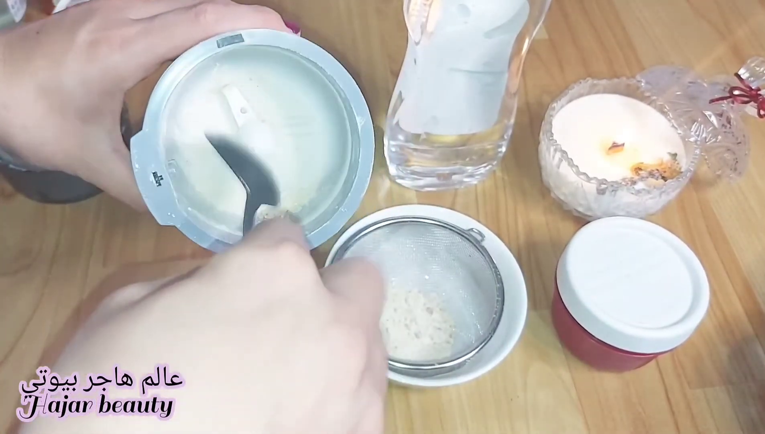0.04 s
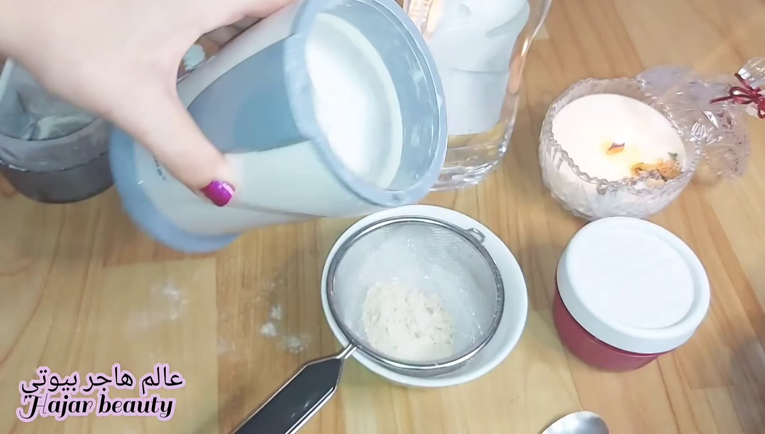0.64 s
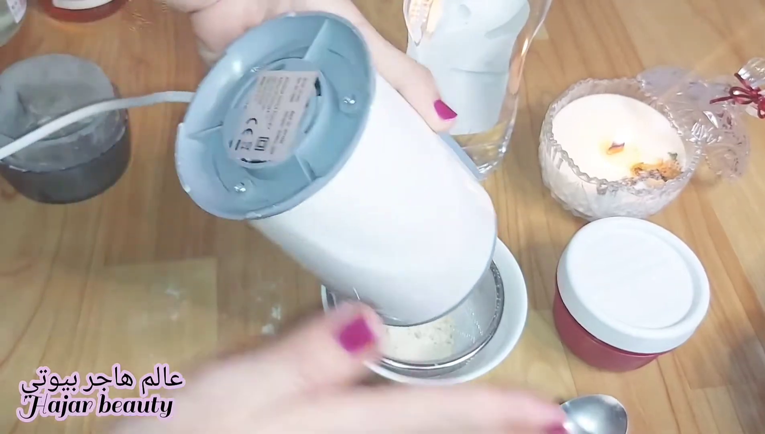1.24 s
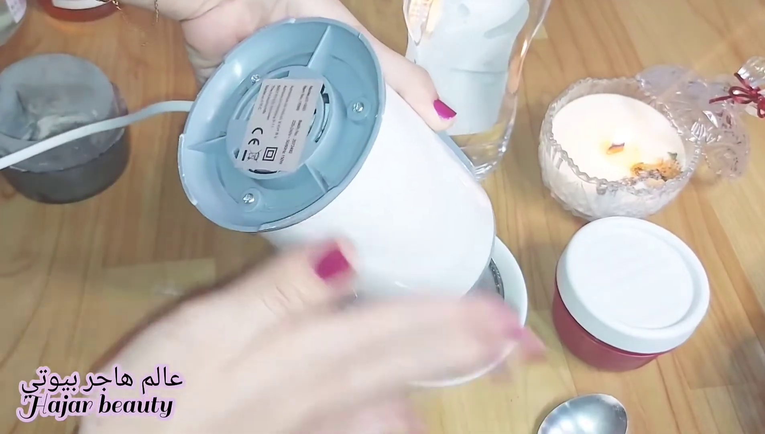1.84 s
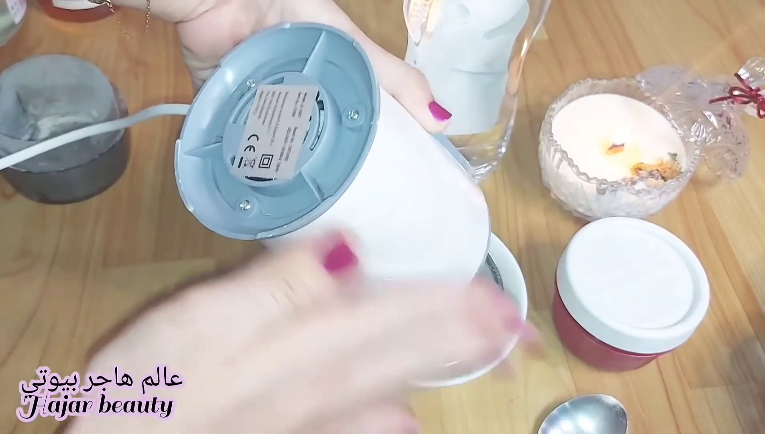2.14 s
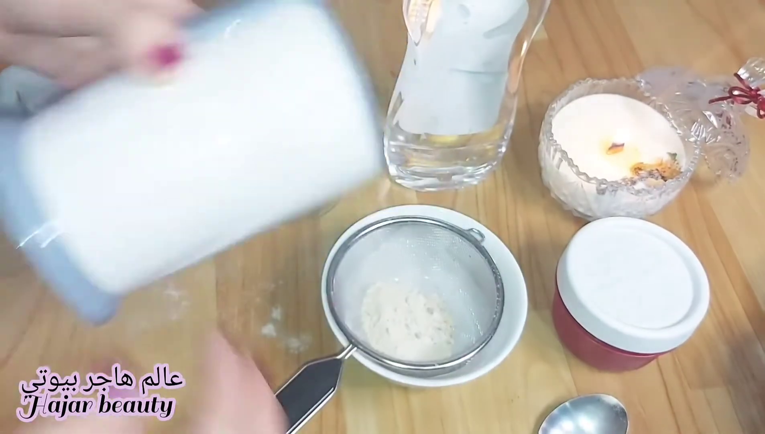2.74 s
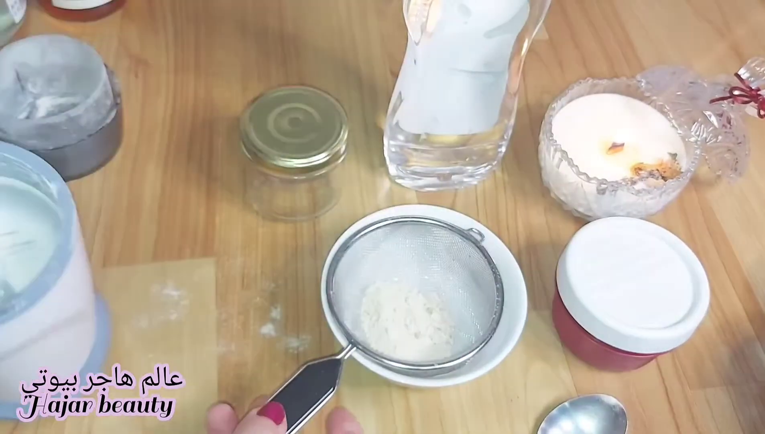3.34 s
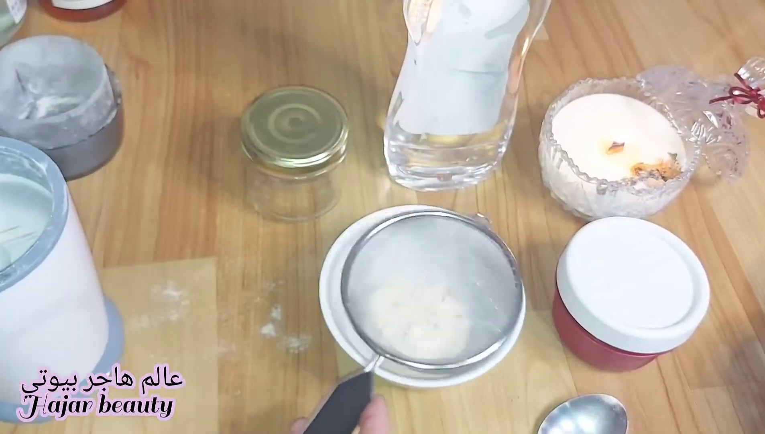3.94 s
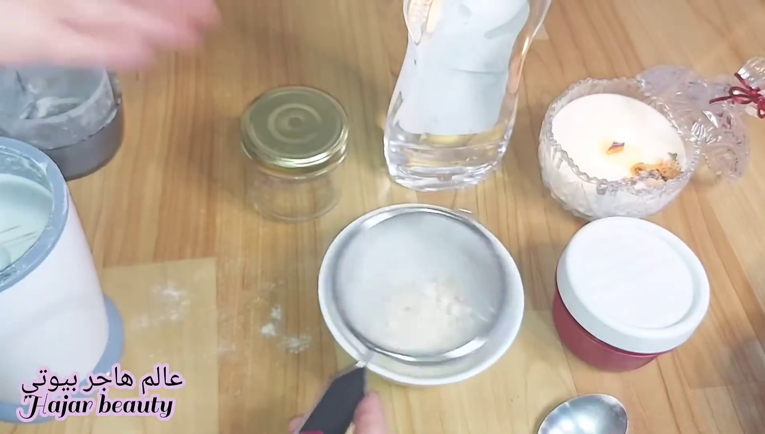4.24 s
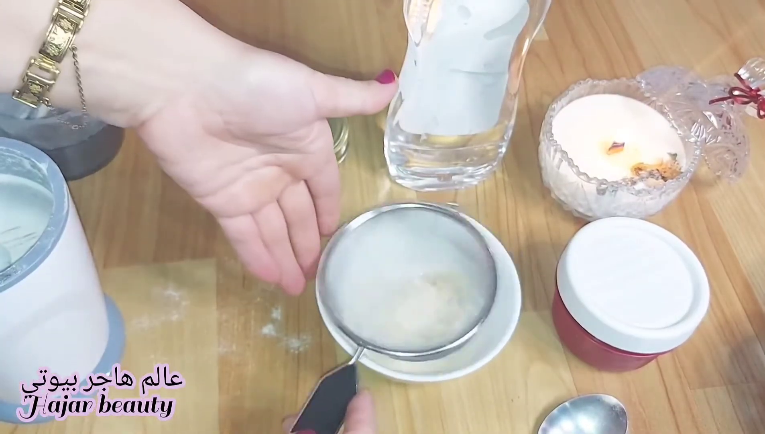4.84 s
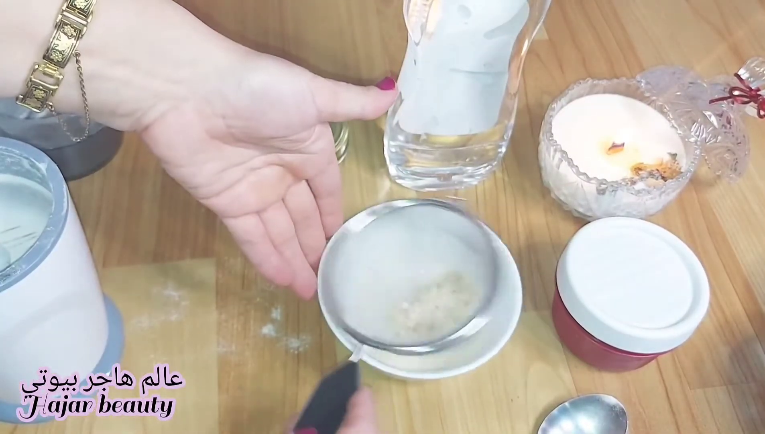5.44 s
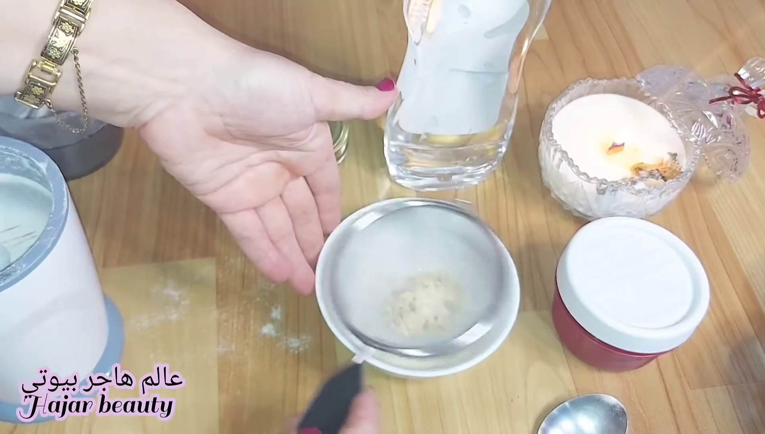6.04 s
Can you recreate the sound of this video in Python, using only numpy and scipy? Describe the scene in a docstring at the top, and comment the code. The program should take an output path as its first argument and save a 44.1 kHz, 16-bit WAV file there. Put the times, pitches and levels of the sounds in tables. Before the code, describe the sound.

A spoon knocks and drops, a palm pats a hollow plastic grinder, then a metal sieve is shaken and tapped on a ceramic bowl.

```python
"""First a spoon knocks in a plastic grinder cup, then drops on the wooden table of a small, hard-walled
kitchen. A palm pats the upturned grinder seven times to empty it, and its hollow body booms.
The grinder is set down, its rubber feet sticking and slipping in a short judder.
A steel sieve is picked up and shaken over a ceramic bowl, so that powder hisses through the mesh.
Last, the sieve is tapped hard on the bowl and its rim rings."""
import sys
import numpy as np
from scipy import signal
from scipy.fft import rfft, irfft, next_fast_len
from scipy.io import wavfile
from scipy.ndimage import map_coordinates

SR = 44100
rng = np.random.default_rng(int(sys.argv[2]) if len(sys.argv) > 2 else 0)


def dump_mix(stems):
    """Bounce the given channels to the path in sys.argv[1] as a 16-bit WAV at rate SR."""
    frames = np.atleast_2d(stems).T  # one column per channel
    limited = np.clip(frames, -1, 1)  # hard clip at full scale
    pcm = np.round(limited * 32767).astype(np.int16)
    wavfile.write(sys.argv[1], SR, pcm)


N = 269346
CLOCK = np.arange(N) / SR  # seconds through the scene
T = np.arange(int(.8 * SR)) / SR  # seconds through one hit

# A t60 is the time a sound takes to fade by 60 dB. A "tone" says how strong each frequency is.
# how long the room echoes: f/Hz, t60/s
ROOM_T60 = [(100, 0.62), (300, 0.49), (800, 0.45), (2000, 0.36), (5000, 0.35), (9000, 0.33), (14000, 0.19)]
# how alike the room sounds left and right: f/Hz, likeness (1 = the same)
ROOM_ALIKE = [(60, .88), (140, .95), (280, .92), (500, .3), (900, .05), (2000, .15), (8000, .2)]

# tones of the longer noises: f/Hz, level/dB
HUM_TONE = [(15, -49), (25, -8.5), (76, 1), (175, -16.5), (301, -2.5), (863, -30), (2910, -32.5),
            (3520, -40.5), (4140, -36.5), (7920, -39.5), (12500, -28), (14800, -37.5), (16000, -56.5)]
RUB_TONE = [(30, -26), (55, -15), (88, -3), (150, -10.5), (237, -12), (297, -0.5), (368, -10), (495, -8),
            (650, -23.5), (1000, -33), (2500, -40), (5000, -62)]
HISS_TONE = [(700, 0), (1500, -13), (4000, 3), (6500, 1.5), (9000, 3), (12000, 3.5), (14700, -1),
             (16000, -12.5)]
FEET_TONE = [(100, -23), (280, 1.5), (450, -16), (800, -17.5), (1400, -37), (3500, -27), (6000, -41),
             (14000, -61.5)]

# tones of the short hits: f/Hz, level/dB
THUD_TONE = [(25, -20), (55, -3.5), (100, -7), (160, -0.5), (300, -6), (500, -10.5), (900, -36.5),
             (2000, -44.5)]
RATTLE_TONE = [(350, -54), (600, -10), (881, -23), (1410, 0.5), (1680, -11), (3300, -9), (3890, -4),
               (4910, -17), (11300, -19.5), (14700, -27), (16000, -34.5)]
KNOCK_TONE = [(47, -59), (80, -26), (302, -8), (444, -6.5), (489, -4), (617, -8), (1060, -9.5), (2380, -11),
              (3300, -48), (5990, -36), (8000, -79.5), (10400, -73), (17600, -120)]
CUP_CRACK_TONE = [(300, -1.5), (420, 26.5), (900, -23.5), (1550, 11), (3100, -10.5), (4000, 15.5),
                  (5000, -7.5), (6300, -6), (9500, -15), (12200, 7), (13500, -8), (16000, -26)]
SPOON_CLACK_TONE = [(120, -51), (200, -3.5), (1180, -9), (1740, 0.5), (3310, -2.5), (3620, -2),
                    (6520, -17.5), (6880, -17), (11100, -15), (14100, -26), (16000, -22.5)]
AIR_POP_TONE = [(130, -35), (260, -9), (330, -5), (560, -10), (850, -14.5), (1130, -12.5), (1450, -17.5),
                (2050, -10), (2450, -19), (2850, -15.5), (3900, -23.5), (7000, -25.5), (12000, -45)]
SKIN_SMACK_TONE = [(1500, -26.5), (4000, 7.5), (6000, -14.5), (8000, -5), (11000, 4), (13500, -5),
                   (16000, -23.5)]
BOWL_KNOCK_TONE = [(40, -9), (120, -11.5), (230, -0.5), (300, 1), (550, 3.5), (900, -7), (1500, -8),
                   (2400, -9.5), (4000, -22), (8000, -48)]
RIM_CRACK_TONE = [(700, -8), (1600, -9), (2400, 1), (3300, -7), (4000, 0.5), (4650, -15), (5400, 0.5),
                  (7200, -13.5), (8100, -1), (9600, -19), (11300, -5.5), (13300, -20), (14600, -8.5),
                  (16500, -8.5)]

# the notes each object rings with when hit: f/Hz, level/dB, t60/s
TABLE_NOTES = [(93, -12, 0.59), (137.2, -1, 0.43), (207, -5, 0.19), (290, -19, 0.16)]
CUP_WALL_NOTES = [(407, -33.5, 0.52), (730, -12.5, 0.043), (1220, -9.5, 0.04), (1428, 5, 0.025),
                  (1702, -1.5, 0.017), (2760, -4.5, 0.019)]
CUP_EDGE_NOTES = [(1460, -10.5, 0.046), (2690, -6.5, 0.04), (3970, -11.5, 0.017), (4040, 14, 0.0115),
                  (7840, -24.5, 0.012), (5680, -2, 0.026), (6530, 0, 0.0052), (12600, -11, 0.025),
                  (13200, -10.5, .03)]
SPOON_SCOOP_NOTES = [(5868, 1, 0.84), (10310, -11.5, 0.41)]
SPOON_HANDLE_NOTES = [(3521, -3.5, 0.31), (3783, 0, 0.36), (5230, -5.5, 0.25), (6940, -1, 0.33),
                      (8495, -25, 0.21), (8845, -17, 0.21), (10700, -14.5, 0.17)]
GRINDER_NOTES = [(250.5, -5, 0.5), (276.8, 11, 0.32), (330, -9, 0.12), (402, 6, 0.13), (456, -17.5, .2),
                 (664, -2.5, 0.33), (1197, 2.5, 0.072)]
RIM_LOW_NOTE = [(2946, 0, .46)]
RIM_HIGH_NOTES = [(5207, -6.5, .5), (5240, -13, .4), (7930, -7, .24), (7962, 0, .19), (10993, 1, .21),
                  (11040, -8, .14), (14340, -12, .18), (14590, -12, .12), (15250, -10, .18)]
BOWL_WALL_NOTE = [(1209, 0, 0.34)]
BOWL_BOOM_NOTES = [(278.2, -5, 0.34), (302.5, 1.5, 0.37), (342.7, 11, 0.085), (416, 3.5, 0.19),
                   (490, 0, 0.32), (550, -26, 0.3), (579.3, -14, 0.59), (593, -20.5, 0.71),
                   (784, -7.5, 0.31), (960, -17, 0.29)]  # the bowl standing on the table
CLINK_NOTES = [(3540, -1, 0.011), (4050, -7, 0.0092), (4030, 13.5, 0.011), (5750, -27, 0.0066),
               (7500, 17, 0.0083), (11000, 10.5, 0.043), (14570, -20, 0.014)]  # rim and bowl while they touch
# which side the notes of the rim and the bowl's wall lean to: f/Hz, left minus right/dB
RIM_PAN = [(1206, -1), (2946, -9.5), (5207, -8.5), (7950, -11.5), (11000, 3.5), (15000, 1)]

# a hand or an object slides: t of the peak/s, rub/dB, hiss/dB, rise/s, t60/s
SLIDES = [(2.939, -58, -62, 0.094, 0.84), (3.06, -38, -78, 0.13, 0.44), (3.25, -52.5, -80.5, 0.45, 2.05),
          (3.85, -42, -68, 0.11, 0.53)]
# things nudged on the table: t/s, thud/dB, table top/dB, rattle/dB
BUMPS = [(2.878, -50.5, -80, -51.5), (3.627, -44, -38.5, -57.5), (3.807, -42, -32.5, -42.5)]
# rubber feet slip on the table: t/s, slip rate/Hz, level/dB
JUDDER = [(2.969, 320, -69), (3.012, 310, -42.5), (3.056, 230, -38.5), (3.086, 275, -45), (3.11, 350, -56)]
# a rubber foot drags: t/s, f/Hz, level/dB
SQUEAKS = [(2.959, 1090, -48), (3.025, 1113, -55)]
# the hand rubs the sieve's handle: t/s, level/dB
GRIP_RUB = [(4.08, -77), (4.201, -46), (4.3, -55.5), (4.5, -50.5), (4.63, -43), (4.72, -46.5), (5.2, -46),
            (5.5, -57)]
# the spoon hits the cup: t/s, hollow knock/dB, bright tick/dB, thud/dB
CUP_KNOCKS = [(.0250, -22, -47.5, -74.5), (0.1692, -41.5, -41, -59.5), (0.3433, -37.5, -54, -35)]
# an end of the spoon lands: t/s, knock/dB, clack/dB, scoop ring/dB, handle ring/dB
SPOON_DROPS = [(0.7216, -38.5, -55, -56.5, -83), (.9300, -33, -34, -55.5, -24)]
# the palm hits the grinder: t/s, strength/dB, smack compared with strength/dB
PATS = [(1.451, -28, -13), (1.625, -27, -15), (1.803, -21, -17), (1.98, -21, -18.5), (2.158, -18, -8),
        (2.335, -12, -14), (2.477, -13.5, -18.5)]
# the rim hits the bowl: t/s, strength/dB, change in the rim's low note for the spot that is hit/dB
TAPS = [(3.77, -71, -5), (3.9463, -52, -4.5), (4.096, -77, 10), (4.1582, -61, 6.5), (4.357, -67.5, 5.5),
        (4.4988, -61, 2.5), (4.653, -67, 3.5), (4.7181, -55, -8), (4.7790, -21, 2.5), (4.9394, -20.5, 2),
        (5.094, -47.5, -10), (5.164, -53, -10), (5.255, -36, 5.5), (5.404, -68.5, 1), (5.4708, -58.5, -6.5),
        (5.5434, -18, -2), (5.6846, -18.5, -18.5), (5.8435, -18.5, -3), (6.0067, -20.5, 0)]

BOUNCES, BOUNCE_S, BOUNCE_LOSS_DB = 3, .0158, 3.5  # touches per landing, time between, loss at each
FIRM_PAT_DB, BOOM_MAX_DB, BOOM_GROWTH = -23.5, -32.5, 4.2  # growth is in dB per dB of pat strength
SHAKE_START_S, SHAKE_END_S, SHAKE_FADE_S = 4.1, 5.6, 0.15
POWDER_GAIN_DB, POWDER_DB_PER_S = -63.5, 7  # the flow grows as the lumps break up
HARD_TAP_DB, GRAZE_DB, GRAZES_PER_S = -20, -65, 4


def amp(db):
    """Turn decibels into a number to multiply a sound by."""
    return 10 ** (np.asarray(db) / 20)


def value_at(points, hz):
    """Read between the rows of an (f/Hz, value) table, with every octave equally wide."""
    freqs, values = np.transpose(points)
    return np.interp(np.log(hz + 1), np.log(freqs), values)


def unit(x):
    """Scale a sound to an average (rms) size of 1."""
    return x / np.sqrt(np.mean(x ** 2) + 1e-20)


def unit_onset(x):
    """Scale a hit to an average (rms) size of 1 over its first 20 ms."""
    return x / np.sqrt(np.mean(x[..., :SR // 50] ** 2) + 1e-20)


def colour(x, tone):
    """Filter a sound to give it a tone."""
    n = x.shape[-1]
    padded = 2 * next_fast_len(n // 2 + 2048)
    gain = amp(value_at(tone, np.fft.rfftfreq(padded, 1 / SR)))
    cepstrum = irfft(np.log(gain))
    # folding this in half keeps the filter from sounding before the hit
    cepstrum[1:padded // 2] *= 2
    cepstrum[padded // 2 + 1:] = 0
    return irfft(rfft(x, padded) * np.exp(rfft(cepstrum)), padded)[..., :n]


def wobble(rate, size=N):
    """A wandering curve that heads for a new random value `rate` times a second."""
    points = rng.standard_normal(int(size * rate / SR) + 4)
    return map_coordinates(points, [CLOCK[:size] * rate], order=1)


def surround_noise(size):
    """Noise from all sides: left and right are alike only in the bass."""
    likeness = value_at(ROOM_ALIKE, np.fft.rfftfreq(size, 1 / SR))
    angle = np.arccos(np.clip(likeness, -1, 1)) / 2
    mid, side = irfft(rfft(rng.standard_normal((2, size))) * [np.cos(angle), np.sin(angle)], size)
    return np.array([mid + side, mid - side])


def burst(tone, t60, rise, snap=0):
    """One hit: so many short notes that they blur into noise. Snap adds the sharp first touch."""
    noise = rng.standard_normal(len(T)) + .6 * surround_noise(len(T))
    hit = noise * amp(-60 * T / t60) * (1 - np.exp(-T / rise)) ** 2
    hit[:, SR // 1000] += snap * np.linalg.norm(hit[0])
    return unit_onset(colour(hit, tone))


def ring(notes, rise=0.00025, pan=None):
    """An object's notes swell over `rise` seconds and fade, in a slightly new mix on every hit."""
    out = np.zeros((2, len(T)))
    for hz, db, t60 in notes:
        lean_db = value_at(pan, hz) / 2 if pan else 0
        wave = np.sin(2 * np.pi * hz * T + rng.uniform(0, 2 * np.pi))
        fade = amp(db + rng.normal() - 60 * T / t60)
        out += amp([[lean_db], [-lean_db]]) * wave * fade
    return unit_onset(out) * (1 - np.exp(-T / rise)) ** 2


def kitchen(x, room_db, lag_ms=.13):
    """The sound arrives on the left, lag_ms later on the right, and echoes off the walls."""
    x = x * np.ones((2, 1))
    hz, t, bands = signal.stft(surround_noise(len(T)), SR, nperseg=256)
    fade = amp(-60 * t / value_at(ROOM_T60, hz)[:, None])
    tail = signal.istft(bands * fade, SR, nperseg=256)[1][:, :len(T)]
    build_up = 1 - np.exp(-(T / 0.0029) ** 2)
    tail = unit(tail * build_up) / np.sqrt(len(T))
    delayed = np.arange(x.shape[1]) - lag_ms * SR / 1000
    direct = np.array([x[0], map_coordinates(x[1], [np.round(delayed)], order=0)])
    return direct + amp(room_db) * signal.fftconvolve(x, tail, axes=1)[:, :x.shape[1]]


def add(track, s, sound):
    """Mix a sound into the track, starting at s seconds."""
    part = track[:, max(round(s * SR), 0):][:, :sound.shape[-1]]
    part += sound[..., :part.shape[1]]


def room_hum():
    """The quiet, steady, low noise of the room."""
    return amp(-61.5) * unit(colour(surround_noise(N), HUM_TONE))


def slides():
    """The grinder and the hands slide over the table: each move swells and dies away."""
    out = np.zeros((2, N))
    rub = unit(colour(surround_noise(N), RUB_TONE))
    hiss = unit(colour(surround_noise(N), HISS_TONE))
    for s, rub_db, hiss_db, rise, t60 in SLIDES:
        swell = np.clip(1 + (CLOCK - s) / rise, 0, 1) ** 2
        fade = amp(-60 * np.maximum(CLOCK - s, 0) / t60)
        out += swell * fade * (amp(rub_db) * rub + amp(hiss_db) * hiss)
    return out * amp(1.5 * wobble(14))


def sifting():
    """The hand rubs the sieve's handle while powder hisses through and crumbs tick on the wires."""
    s, rub_db = np.transpose(GRIP_RUB)
    grip = amp(np.interp(CLOCK, s, rub_db, left=-120) + 2 * wobble(14))
    rub = grip * unit(colour(surround_noise(N), RUB_TONE))
    flow = amp(2 * wobble(16))
    grains = rng.standard_normal((2, N)) * amp(3.4 * wobble(1000))
    dust = unit(colour(grains, HISS_TONE))
    crumb_falls = rng.random(N) < 70 * flow / SR  # about 70 a second
    crumbs = crumb_falls * rng.uniform(.2, 1, N) ** 2
    ticks = unit(kitchen(colour(crumbs, HISS_TONE), room_db=-3.5))
    powder = amp(-5) * flow * dust + amp(-3) * ticks
    elapsed = CLOCK - SHAKE_START_S
    shaking = np.clip(np.minimum(elapsed, SHAKE_END_S - CLOCK) / SHAKE_FADE_S, 0, 1)
    return rub + shaking * amp(POWDER_GAIN_DB + POWDER_DB_PER_S * elapsed) * powder


def table_bumps():
    """Soft bumps make the table top boom and rattle what is being held."""
    out = np.zeros((2, N))
    for s, thud_db, top_db, rattle_db in BUMPS:
        thud = amp(thud_db) * burst(THUD_TONE, t60=0.15, rise=0.00041)
        top = amp(top_db) * ring(TABLE_NOTES, rise=0.0022)
        rattle = amp(rattle_db) * burst(RATTLE_TONE, t60=0.015, rise=0.0012)
        add(out, s, kitchen(thud, room_db=1) + kitchen(top, room_db=-9) + kitchen(rattle, room_db=2.5))
    return out


def feet_judder():
    """The grinder's rubber feet squeak, then stick and slip as it comes to rest."""
    s, slip_hz, db = np.transpose(JUDDER)
    uneven_hz = np.interp(CLOCK, s, slip_hz) * (1 + .03 * wobble(150))
    slip_count = np.floor(np.cumsum(uneven_hz) / SR)
    clicks = np.diff(slip_count, prepend=0) * amp(2 * wobble(200))  # one click for each slip
    scrape = unit(clicks - clicks.mean()) + .25 * rng.standard_normal(N)
    level = amp(np.interp(CLOCK, s, db, left=-120, right=-120))
    out = np.ones((2, 1)) * unit(colour(scrape, FEET_TONE)) * level
    for start, hz, squeak_db in SQUEAKS:
        add(out, start, amp(squeak_db) * ring([(hz, 0, .16)], rise=0.01))
    return kitchen(out, room_db=-4)


def cup_knocks():
    """The spoon knocks on the cup's hollow wall or ticks on its edge."""
    out = np.zeros((2, N))
    for s, knock_db, tick_db, thud_db in CUP_KNOCKS:
        knock = ring(CUP_WALL_NOTES) + amp(-9.5) * burst(KNOCK_TONE, t60=0.031, rise=0.00047)
        tick = ring(CUP_EDGE_NOTES) + amp(6.5) * burst(CUP_CRACK_TONE, t60=0.014, rise=0.0012)
        add(out, s, kitchen(amp(knock_db) * knock + amp(tick_db) * tick, room_db=-5))
        thud = amp(thud_db) * burst(THUD_TONE, t60=0.086, rise=0.00034)
        add(out, s, kitchen(thud, room_db=1))
    return out


def spoon_drop():
    """The spoon lands on the table scoop first, then its handle falls; each end bounces and rings."""
    out = np.zeros((2, N))
    for s, knock_db, clack_db, scoop_db, handle_db in SPOON_DROPS:
        for bounce in range(BOUNCES):
            knock = amp(knock_db) * burst(KNOCK_TONE, t60=0.027, rise=0.0002)
            clack = amp(clack_db) * burst(SPOON_CLACK_TONE, t60=0.006, rise=0.00014)
            scoop = amp(scoop_db) * ring(SPOON_SCOOP_NOTES, rise=0.018)
            handle = amp(handle_db) * ring(SPOON_HANDLE_NOTES, rise=0.041)
            hit = kitchen(knock + clack, room_db=7)  # off to one side, so mostly echo
            steel = amp([[-2], [2]]) * kitchen(scoop + handle, room_db=-3, lag_ms=0)
            add(out, s + bounce * BOUNCE_S, amp(-bounce * BOUNCE_LOSS_DB) * (hit + steel))
    return out


def palm_pats():
    """Skin smacks the plastic; just after, the trapped air pops and the grinder's body booms."""
    out = np.zeros((2, N))
    for s, db, smack_db in PATS:
        smack = amp(db + smack_db) * burst(SKIN_SMACK_TONE, t60=.008, rise=0.0035, snap=0.38)
        pop = amp(db - 9.5) * burst(AIR_POP_TONE, t60=0.027, rise=0.00052)
        thud = amp(db - 28) * burst(THUD_TONE, t60=0.033, rise=0.0016)
        # the boom grows up to a firm pat; beyond that the grip holds it back
        boom_db = BOOM_MAX_DB + BOOM_GROWTH * min(db - FIRM_PAT_DB, 0)
        boom = amp(boom_db) * ring(GRINDER_NOTES, rise=0.0016)
        add(out, s, kitchen(smack, room_db=-6.5))
        add(out, s + 0.0019, kitchen(pop + thud, room_db=-5) + kitchen(boom, room_db=-6))
    return out


def rim_hit(db, spot_db, free_s):
    """The steel rim cracks on the bowl and both ring; after free_s the next touch hushes the rim."""
    force_db = db - HARD_TAP_DB  # scaled by less than 1 below, so light taps ring more than they crack
    crack = burst(RIM_CRACK_TONE, t60=0.011, rise=0.00025, snap=0.43)
    clink = amp(-9.5) * ring(CLINK_NOTES)
    hush = amp(-60 * np.maximum(T - free_s, 0) / 0.0182)
    flutter = 1 + .45 * wobble(90, size=len(T))  # the loose mesh shakes the high notes
    low_rise = 0.0037 * amp(-0.25 * force_db)  # a light touch slides, so its ring swells more slowly
    low = amp(-21.5 + 0.62 * force_db + spot_db) * ring(RIM_LOW_NOTE, rise=low_rise, pan=RIM_PAN) * hush
    high = amp(-27 + 0.74 * force_db) * ring(RIM_HIGH_NOTES, pan=RIM_PAN) * hush * flutter
    wall = amp(-37.5 + 0.41 * force_db) * ring(BOWL_WALL_NOTE, rise=0.00054, pan=RIM_PAN)
    knock = amp(-30.5 + 0.87 * force_db) * burst(BOWL_KNOCK_TONE, t60=0.033, rise=0.00066)
    boom = amp(-20 + 0.87 * force_db) * ring(BOWL_BOOM_NOTES, rise=0.016)
    hit = amp([[-.7], [.7]]) * kitchen(amp(db) * (crack + clink), room_db=-6, lag_ms=.26)
    hit += kitchen(knock, room_db=4)
    rim = kitchen(low, room_db=-12, lag_ms=.363) + kitchen(high, room_db=-5, lag_ms=.363)
    bowl = amp([[.9], [-.9]]) * kitchen(wall + boom, room_db=-11)
    return hit + rim + bowl


def sieve_taps():
    """The sieve's rim taps the bowl, and brushes it faintly by chance while being shaken."""
    out = np.zeros((2, N))
    next_taps = [tap[0] for tap in TAPS[1:]] + [np.inf]
    for (s, db, spot_db), next_s in zip(TAPS, next_taps):
        add(out, s, rim_hit(db, spot_db, free_s=next_s - s))
    shake_s = SHAKE_END_S - SHAKE_START_S
    for when, force in rng.random((round(GRAZES_PER_S * shake_s), 2)):
        graze = rim_hit(GRAZE_DB + (2 * force - 1), spot_db=0, free_s=np.inf)
        add(out, SHAKE_START_S + when * shake_s, graze)
    return out


def scene():
    """Add the spoon, the grinder and the sieve to the hum of the room."""
    hum = room_hum()
    spoon = cup_knocks() + spoon_drop()
    grinder = palm_pats() + table_bumps() + feet_judder() + slides()
    sieve = sifting() + sieve_taps()
    return hum + spoon + grinder + sieve


def record(dry):
    """Clip peaks at full scale, then take away the deepest bass and the highest treble."""
    padded = next_fast_len(N + SR // 2)
    hz = np.fft.rfftfreq(padded, 1 / SR)
    bass_cut = (1j * hz / (1j * hz + 28)) ** 3
    treble_cut = 1 / (1 + (hz / 15650) ** 80)
    return irfft(rfft(np.clip(dry, -1, 1), padded) * bass_cut * treble_cut, padded)[:, :N]


dry = scene()
out = record(dry)
dump_mix(out)
```